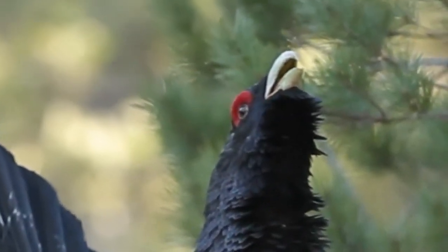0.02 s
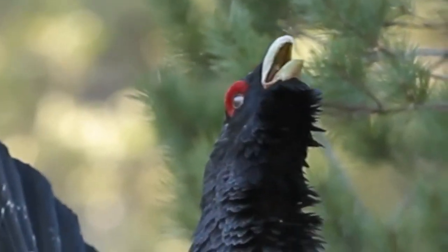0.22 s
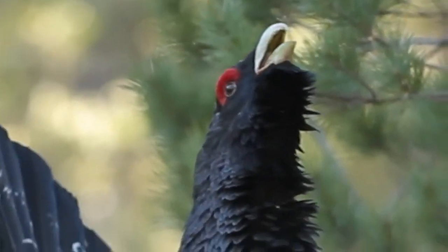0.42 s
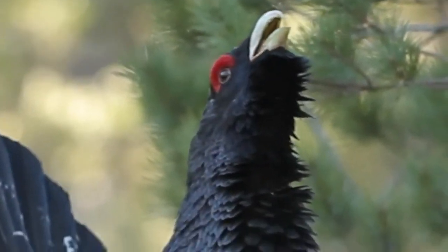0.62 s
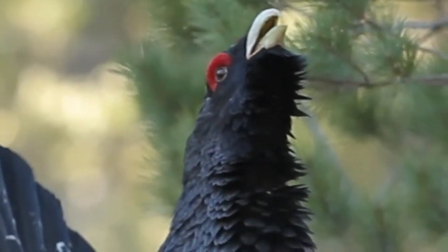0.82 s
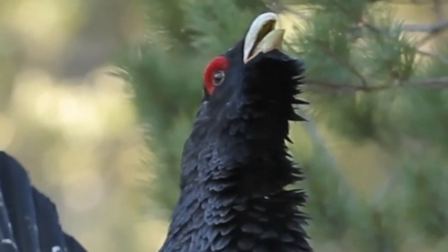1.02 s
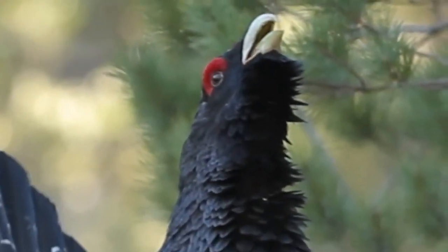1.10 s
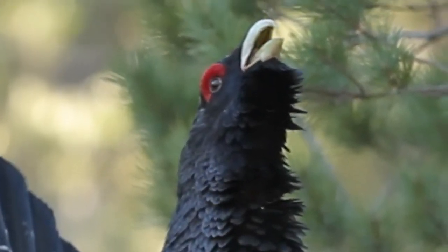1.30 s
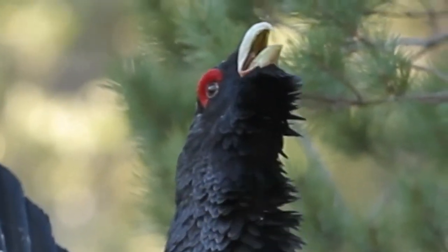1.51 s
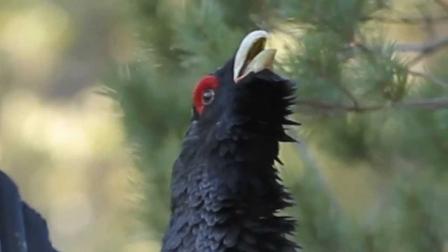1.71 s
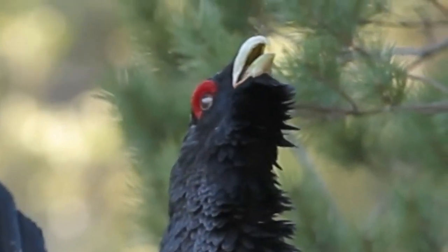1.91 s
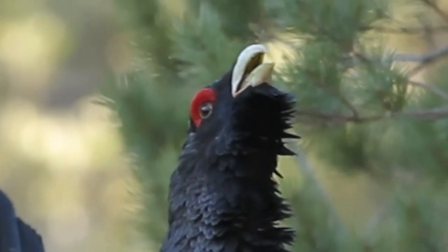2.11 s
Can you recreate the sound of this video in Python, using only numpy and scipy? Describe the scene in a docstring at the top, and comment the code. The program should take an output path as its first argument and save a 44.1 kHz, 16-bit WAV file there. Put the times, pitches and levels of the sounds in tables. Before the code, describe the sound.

A large grouse clicks sharply in a quiet pine forest, heard close. Dry, bony snaps with a brief raspy edge and hollow low pop come at about 0.24 and 0.40 seconds, then again at 1.28 and 1.46. A faint throaty creak precedes each second click; dull trunk echoes barely follow. Tiny soft ticks dot the time from 0.7 onward, over faint lumpy wind, distant low drone and steady hiss.

```python
"""Faint lumpy wind on the microphone, a far low drone and hiss run throughout, all filtered noise.
A large grouse in a pine forest then gives a pair of dry clicks, and about a second later another pair.
Each click is a throat snap ringing windpipe and open bill, with a noisy rasp, a puff and a hollow air-sac pop;
dull echoes off nearby trunks follow. A faint friction-noise creak comes ahead of each second click.
From between the pairs to the end, a few tiny ticks: dull single pulses."""
import sys
import numpy as np
from scipy import signal
from scipy.fft import rfft, irfft
from scipy.io import wavfile

SR = 44100
rng = np.random.default_rng(int(sys.argv[2]) if len(sys.argv) > 2 else 0)


def master(y):
    """Save y as 16-bit WAV."""
    cut = np.clip(np.atleast_2d(y).T, -1, 1)
    pcm = np.round(cut * 32767)  # scale
    wavfile.write(sys.argv[1], SR, pcm.astype(np.int16))


N = 97020


def from_db(db):
    """Decibels to gain."""
    return 10 ** (np.asarray(db) / 20)


def rms_one(x):
    """Scale to rms 1."""
    return x / np.sqrt(np.mean(x ** 2) + 1e-20)


def level(rows):
    """Gain over time, linear in dB between (t/s, level/dB) rows."""
    s, db = np.transpose(rows)
    return from_db(np.interp(np.arange(N) / SR, s, db))


def low_pass(x, hz):
    """One-pole low-pass."""
    r = np.exp(-2 * np.pi * hz / SR)
    return signal.lfilter([1 - r], [1, -r], x)


def ring(x, hz, t60_s):
    """Two-pole resonance: a unit impulse rings a decaying sine of height 1."""
    r = from_db(-60 / (t60_s * SR))
    w = 2 * np.pi * hz / SR
    return signal.lfilter([0, np.sin(w)], [1, -2 * r * np.cos(w), r * r], x + 1e-18)


def coloured(spectrum):
    """Noise shaped by (f/Hz, level/dB) rows, joined over log frequency, rms 1."""
    hz, db = np.transpose(spectrum)
    f = np.maximum(np.arange(N // 2 + 1) * SR / N, 1)
    gain = from_db(np.interp(np.log(f), np.log(hz), db))
    return rms_one(irfft(rfft(rng.standard_normal(N)) * gain, N))


def train(s, db):
    """Single-sample impulses at the given times and levels."""
    out = np.zeros(N)
    out[(np.asarray(s) * SR).astype(int)] = from_db(db)
    return out


def decay(impulses, t60_s):
    """Exponential fall after each impulse."""
    return signal.lfilter([1], [1, -from_db(-60 / (t60_s * SR))], impulses + 1e-18)


def add(out, s, sound):
    """Mix a short sound in at a time."""
    i = int(s * SR)
    out[i:i + len(sound)] += sound


# wind level: (t/s, level/dB)
WIND_LEVEL = [(0.0, -64), (0.13, -72), (0.28, -50), (0.41, -64.5), (0.62, -75.5), (0.78, -63.5),
              (0.93, -72), (1.1, -72), (1.21, -57.5), (1.37, -65.5), (1.51, -62), (1.7, -66), (1.89, -70.5),
              (2.2, -70)]
WIND_LOW_HZ, WIND_HIGH_HZ = 22, 74
LUMPS_HZ, LUMPS_RMS_DB = 7.9, 4


def wind():
    """Wind on the microphone: low-band noise, its level wandering slowly at random."""
    sos = signal.butter(2, [WIND_LOW_HZ, WIND_HIGH_HZ], "band", fs=SR, output="sos")
    # the first second of each is dropped so the filters settle
    slow = low_pass(low_pass(rng.standard_normal(N + SR), LUMPS_HZ), LUMPS_HZ)
    lumps = from_db(LUMPS_RMS_DB * rms_one(slow[SR:]))
    rumble = signal.sosfilt(sos, rng.standard_normal(N + SR))[SR:]
    return level(WIND_LEVEL) * rms_one(rumble * lumps)


# far drone level: (t/s, level/dB)
DRONE_LEVEL = [(0.0, -74), (0.65, -74), (0.89, -68.5), (1.1, -71), (1.28, -73.5), (1.64, -89), (1.9, -94),
               (2.06, -85), (2.2, -74)]
DRONE_HZ, DRONE_T60_S = 320, 3.0 / 105


def drone():
    """Noise through one low resonance, swelling and fading."""
    return level(DRONE_LEVEL) * rms_one(ring(rng.standard_normal(N), DRONE_HZ, DRONE_T60_S))


# microphone hiss spectrum: (f/Hz, relative level per Hz/dB)
HISS_SPECTRUM = [(88, -33), (150, -6), (244, -10.5), (309, -5.5), (702, -12), (821, -12.5), (7320, -16),
                 (12400, -11), (15100, -11.5), (16000, -23.5)]
HISS_RMS_DB = -64


def hiss():
    """Steady coloured noise of the microphone."""
    return from_db(HISS_RMS_DB) * coloured(HISS_SPECTRUM)


RISE_T60_S = 0.004
CLOSING_DB_PER_S2 = 20000   # damping grows as the throat relaxes


def swell(hz, t60_s, rise_t60_s):
    """One ring that swells, dies, and is damped ever more."""
    t = np.arange(int(.08 * SR)) / SR
    envelope = from_db(-60 * t / t60_s) - from_db(-60 * t / rise_t60_s)
    closing = from_db(-CLOSING_DB_PER_S2 * t * t)
    return envelope * closing * np.sin(2 * np.pi * hz * t)


# clicks: (t/s, mode level/dB, mode tuning ratio, rasp level/dB, puff level/dB, pop level/dB, pop f/Hz,
#          rasp return level re rasp/dB)
CLICK_EVENTS = [(0.2438, -10.5, 1.03, -23, -23.5, -18.5, 365, -17),
                (.4000, -9, .999, -31, -23.5, -23, 366, -16),
                (1.2840, -11.5, .999, -25.5, -23, -18.5, 366, -8),
                (1.4581, -9.5, .999, -31, -23.5, -26.5, 366, -25)]
# windpipe and bill modes: (f before tuning/Hz, t60 before closing/s, level re click/dB in each of the 4 clicks)
PIPE_MODES = [(829, 0.17, -28, -35, -28, -37.5), (1432, 0.13, -51, -31.5, -54, -31.5),
              (1476, 0.074, -10, -42, -19.5, -37), (1538, 0.045, -32, -39, -12.5, -53),
              (1680, 0.0032, -10.5, -39, 3, -19.5), (1880, 0.034, -13, -26, -11, -30.5),
              (2098, 0.09, -32, -28, -23, -31), (2540, 0.02, -18, -12.5, -22, -13.5),
              (2703, 0.076, -17, -22.5, -11.5, -22), (2780, 0.026, -11, -7.5, -32, -14),
              (2878, 0.006, -10.5, 1.5, -9, 7.5), (3053, 0.025, -11.5, -4.5, -26, -14),
              (3132, 0.04, -12, -46, -9.5, -32), (3425, 0.013, -14.5, -12, -15.5, -8),
              (3750, 0.012, -9, -43, -19, -14), (4040, 0.061, -33.5, -32, -20.5, -42),
              (4830, 0.055, -15, -32, -15.5, -32), (5434, 0.021, -20.5, -21, -17, -24.5),
              (7920, 0.015, -28, -26, -8, -21.5), (8880, .022, -28, -25, -17.5, -42),
              (8960, 0.043, -28.5, -38, -36, -48), (11300, 0.024, -17.5, -26, -18.5, -26),
              (12560, 0.029, -14.5, -31, -20, -21), (13210, 0.03, -9.5, -26, -12.5, -37)]
# noisy edge of the snap: (f/Hz, relative level per Hz/dB)
RASP_SPECTRUM = [(4500, -16), (5500, -7), (6800, -31.5), (7800, -3), (9500, -12.5), (10600, -16),
                 (12500, -8.5), (14500, -15), (16000, -17)]
# air sac: (t60 before closing/s, lag after snap/s, rise t60/s)
SAC_T60_S, SAC_LAG_S, SAC_RISE_T60_S = (0.054, 0.002694, .012)
PUFF_HZ, PUFF_T60_S = 329, 0.016
RASP_T60_S, RASP_RISE_T60_S, RASP_RETURN_S = 0.028, 0.0045, 0.002
RADIATE_HZ = 98   # the bird radiates little below this


def pipe(k, tuning):
    """Windpipe and bill modes rung by the snap of click k."""
    return sum(from_db(mode[2 + k]) * swell(mode[0] * tuning, mode[1], RISE_T60_S) for mode in PIPE_MODES)


def rasp():
    """Noisy edge of each snap: a noise burst that comes back once."""
    s, _, _, db, _, _, _, return_db = np.transpose(CLICK_EVENTS)
    snaps = train(s, db) + train(s + RASP_RETURN_S, db + return_db)
    envelope = decay(snaps, RASP_T60_S) - decay(snaps, RASP_RISE_T60_S)
    return envelope * coloured(RASP_SPECTRUM)


def clicks():
    """Each snap rings the pipe and makes a puff of air and a rasp; the sac pops later and softly."""
    out = np.zeros(N)
    for k, (s, db, tuning, _, puff_db, pop_db, pop_hz, _) in enumerate(CLICK_EVENTS):
        add(out, s, -from_db(db) * pipe(k, tuning))
        add(out, s, from_db(puff_db) * swell(PUFF_HZ, PUFF_T60_S, RISE_T60_S))
        add(out, s + SAC_LAG_S, -from_db(pop_db) * swell(pop_hz, SAC_T60_S, SAC_RISE_T60_S))
    sos = signal.butter(2, RADIATE_HZ, "high", fs=SR, output="sos")
    return signal.sosfilt(sos, out + rasp())


# echoes off nearby trunks: (delay/s, level/dB)
TRUNK_ECHOES = [(.030, -36), (.043, -40)]
ECHO_CUT_HZ = 750


def trunks(x):
    """Delayed copies, dulled by two one-pole low-passes."""
    dull = low_pass(low_pass(x, ECHO_CUT_HZ), ECHO_CUT_HZ)
    return sum(from_db(db) * np.roll(dull, int(s * SR)) for s, db in TRUNK_ECHOES)


# creak ahead of each second click: (t/s, level/dB)
CREAK_EVENTS = [(.368, -57), (1.426, -56)]
# throat resonances: (f/Hz, t60/s, level/dB)
THROAT_MODES = [(344, 0.0216, 0.5), (860, 0.023, -7), (3100, 0.0043, -3.5)]
CREAK_S = 0.028


def creaks():
    """A short breath of friction noise in three throat resonances."""
    gate = np.zeros(N)
    for s, db in CREAK_EVENTS:
        add(gate, s, from_db(db) * np.hanning(int(CREAK_S * SR)) ** .5)
    white = rng.standard_normal(N)
    return gate * sum(from_db(db) * rms_one(ring(white, hz, t60_s)) for hz, t60_s, db in THROAT_MODES)


# tiny ticks: (t/s, level before make-up gain and low-pass/dB)
TICK_EVENTS = [(0.685, -45.5), (0.777, -48.5), (0.962, -52), (1.132, -52), (1.214, -74), (1.558, -54),
               (2.086, -47.5), (2.18, -47)]
TICK_CUT_HZ, TICK_GAIN_DB = 870, 23


def ticks():
    """Impulses of random sign, dulled by two one-pole low-passes."""
    s, db = np.transpose(TICK_EVENTS)
    signs = rng.choice([-1, 1], N)
    pulses = train(s, db + TICK_GAIN_DB) * signs
    return low_pass(low_pass(pulses, TICK_CUT_HZ), TICK_CUT_HZ)


def scene():
    """Everything on one microphone, the same in both channels."""
    bird = clicks()
    mono = bird + trunks(bird) + creaks() + ticks() + wind() + drone() + hiss()
    return np.array([mono, mono])


STOP_HZ, STOP_DB = 16500, 60


def record(dry):
    """Cut the top: steep low-pass, down by STOP_DB from STOP_HZ up."""
    return signal.sosfilt(signal.cheby2(12, STOP_DB, STOP_HZ, fs=SR, output="sos"), dry)


dry = scene()
out = record(dry)
master(out)
```